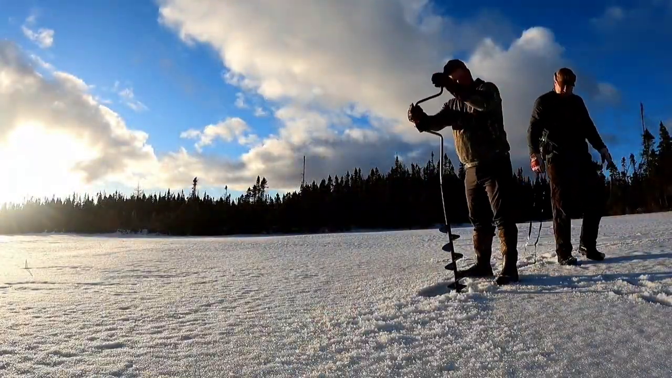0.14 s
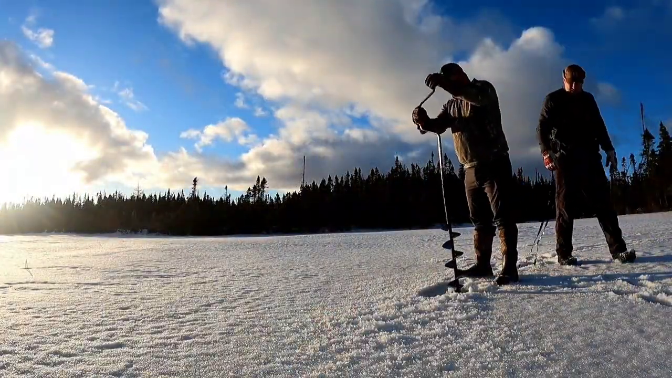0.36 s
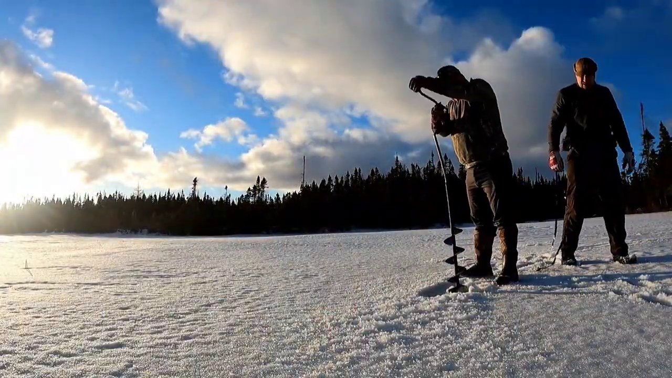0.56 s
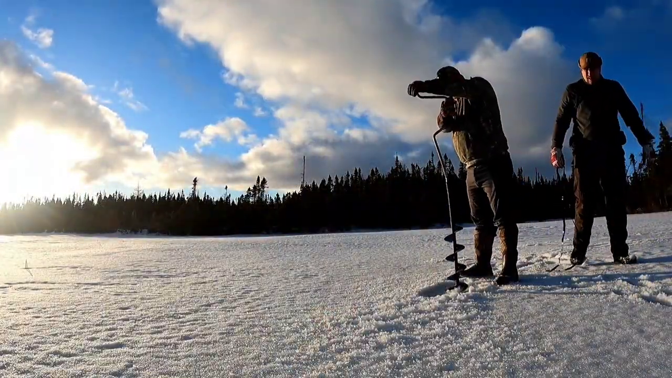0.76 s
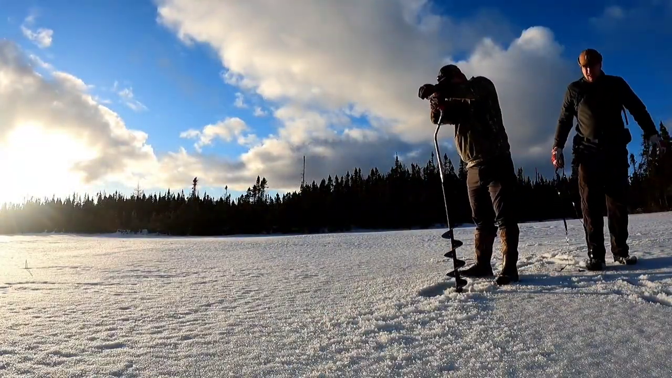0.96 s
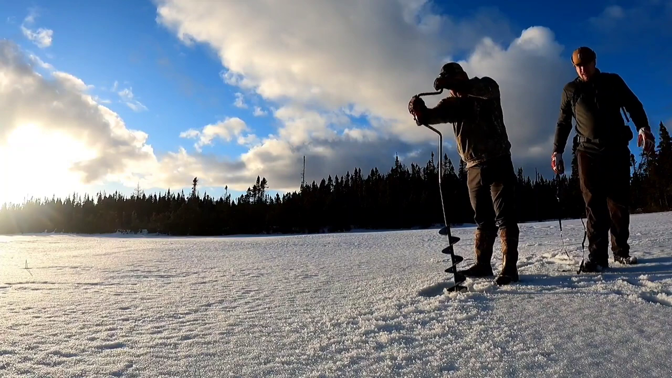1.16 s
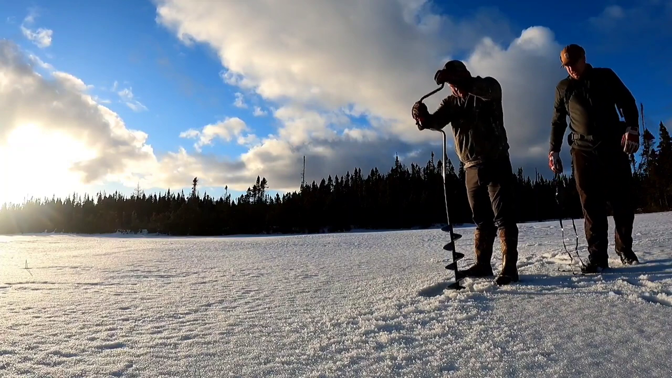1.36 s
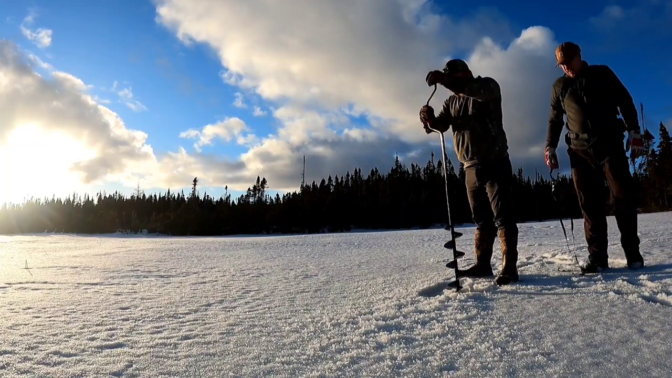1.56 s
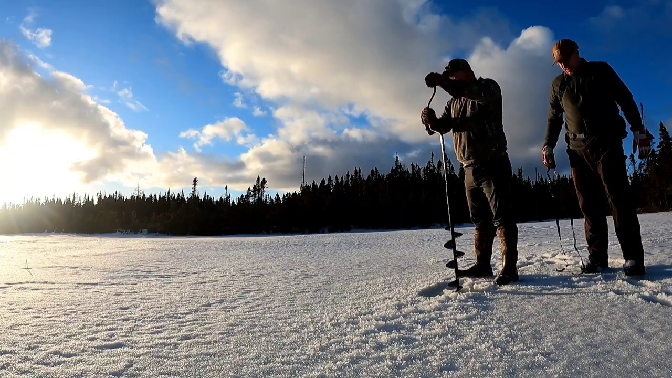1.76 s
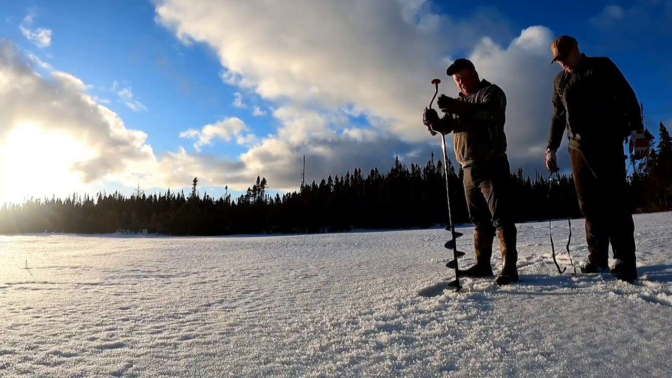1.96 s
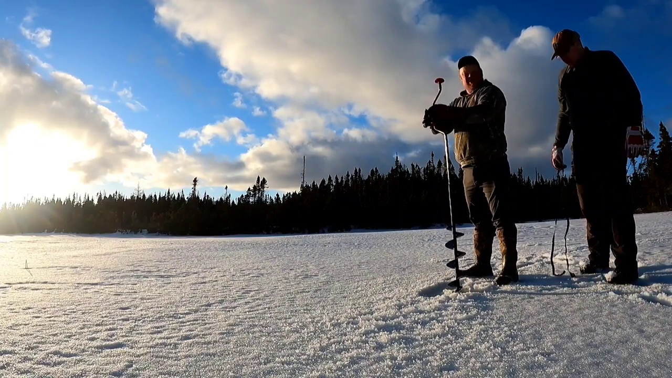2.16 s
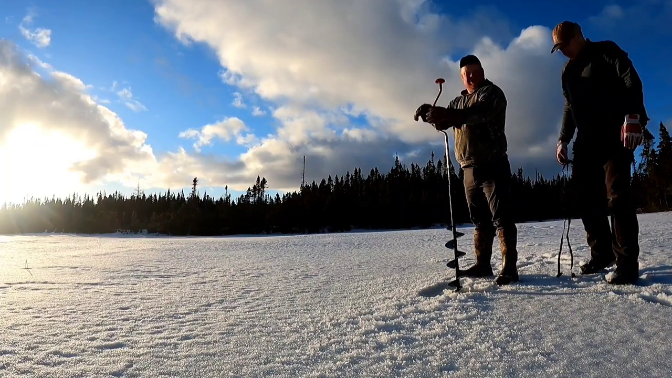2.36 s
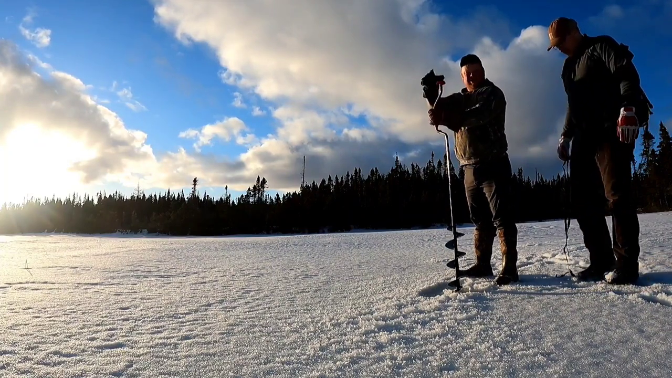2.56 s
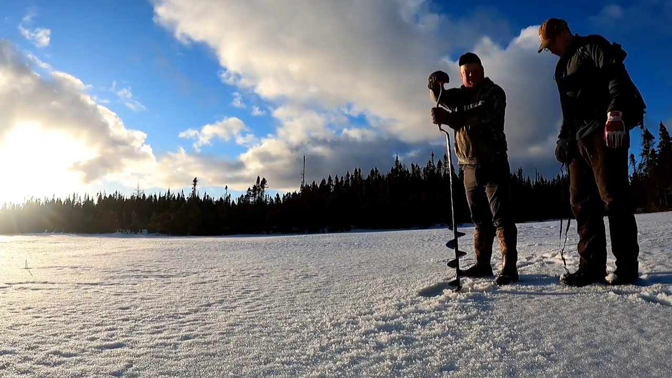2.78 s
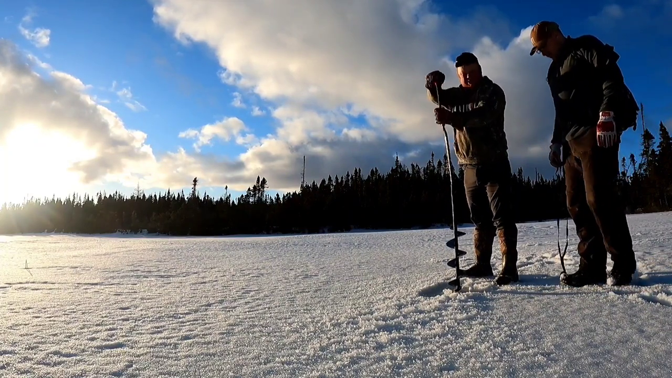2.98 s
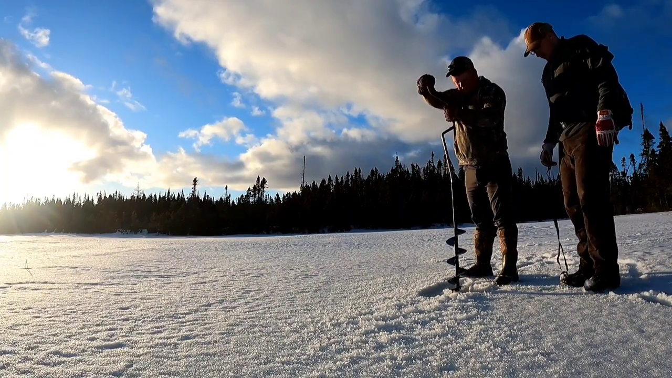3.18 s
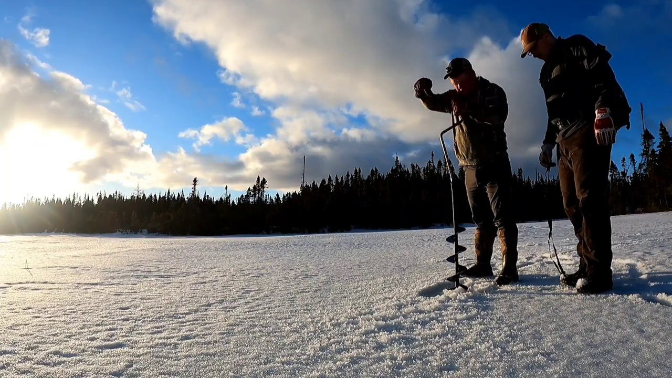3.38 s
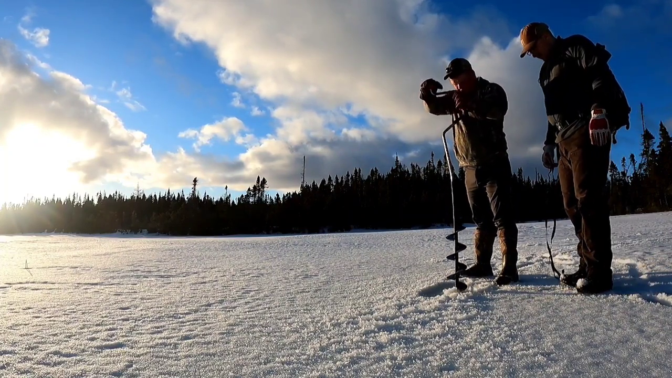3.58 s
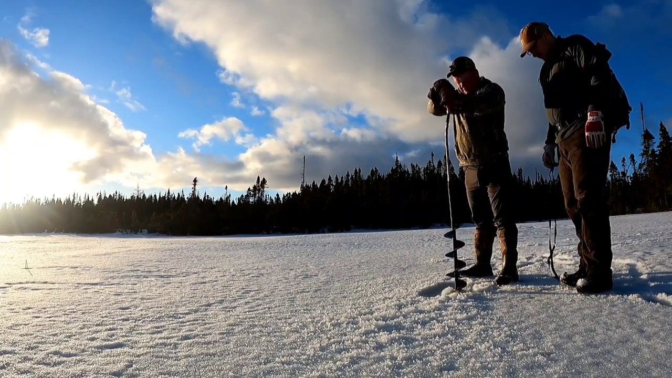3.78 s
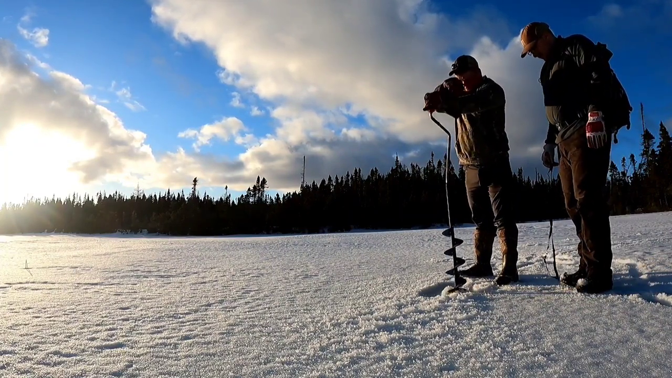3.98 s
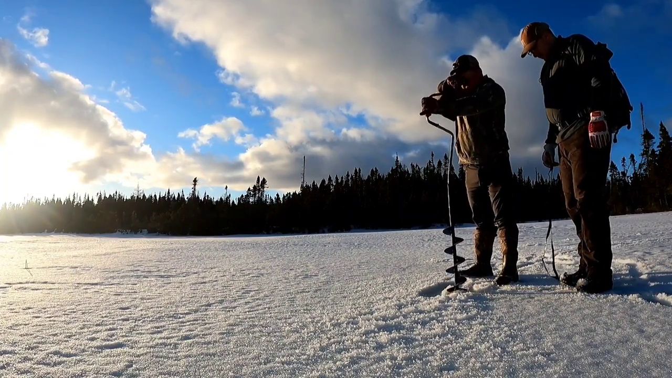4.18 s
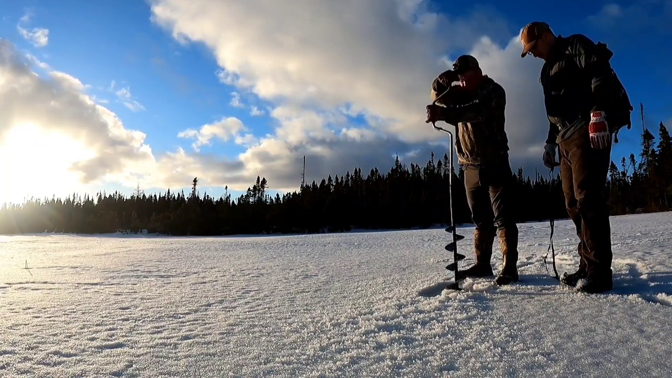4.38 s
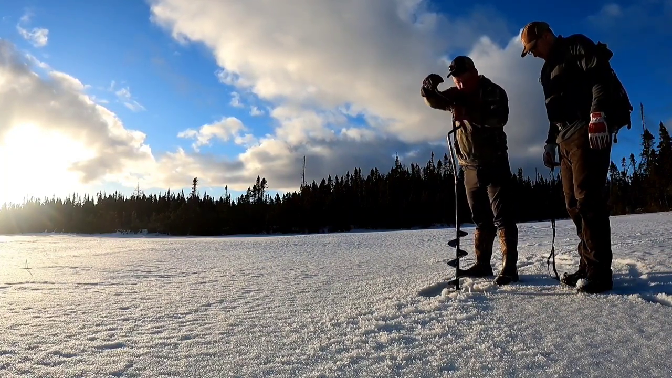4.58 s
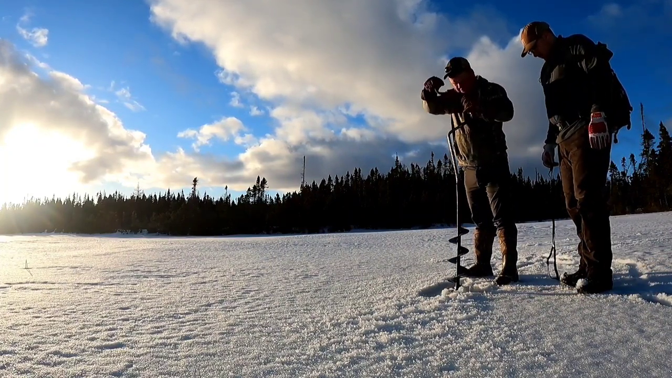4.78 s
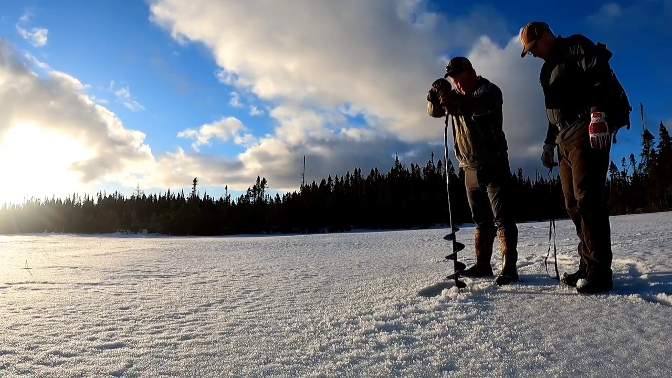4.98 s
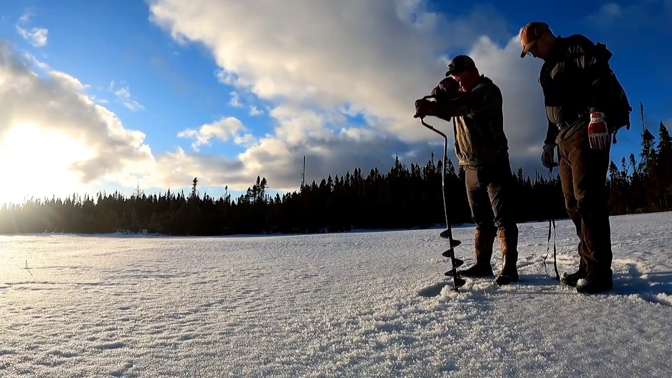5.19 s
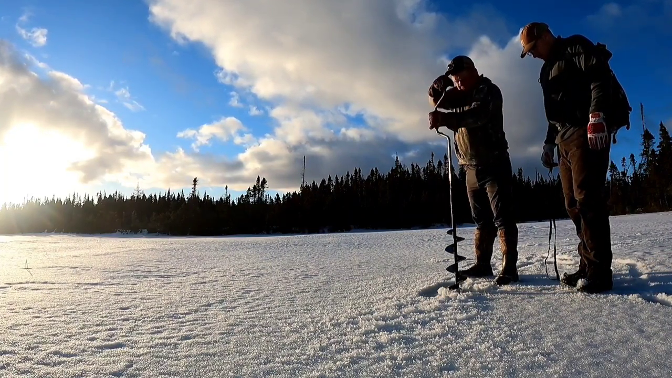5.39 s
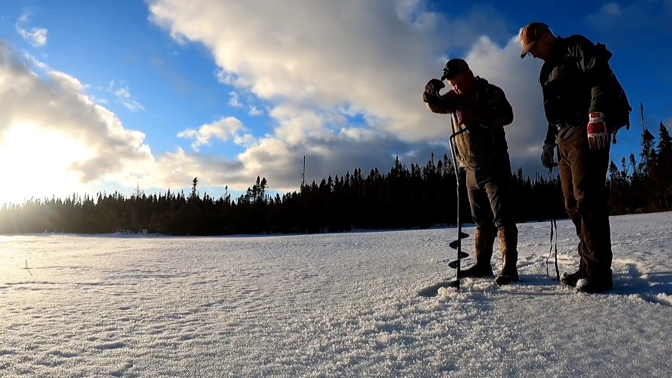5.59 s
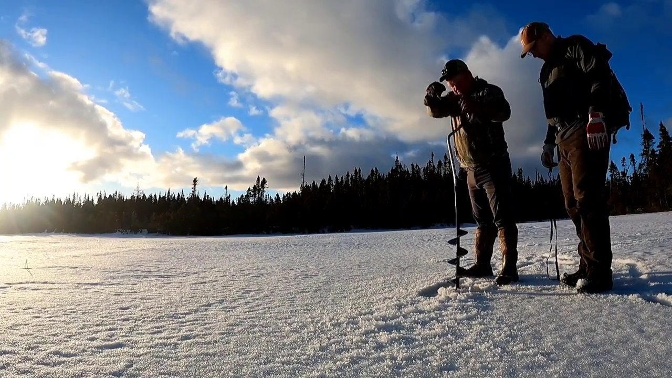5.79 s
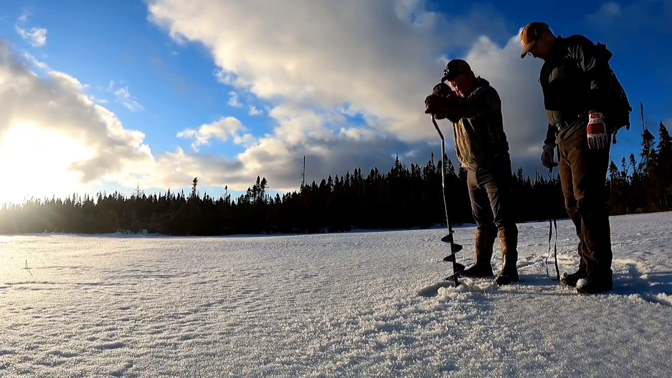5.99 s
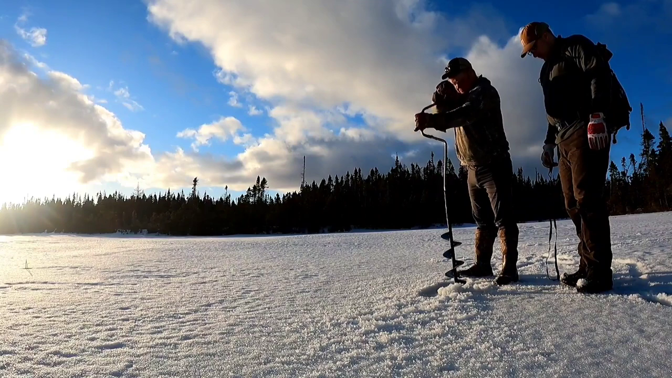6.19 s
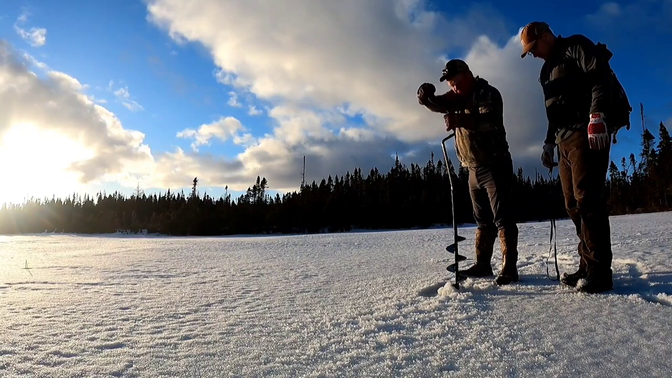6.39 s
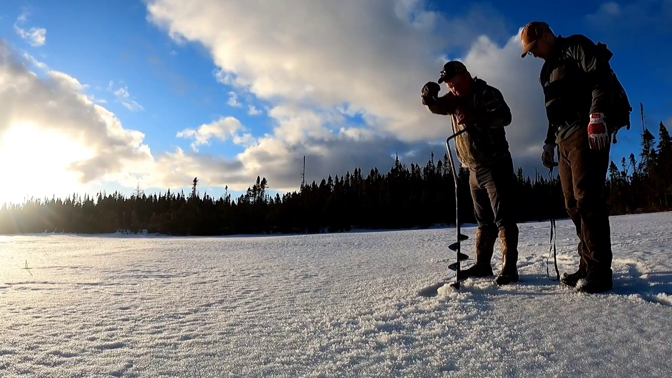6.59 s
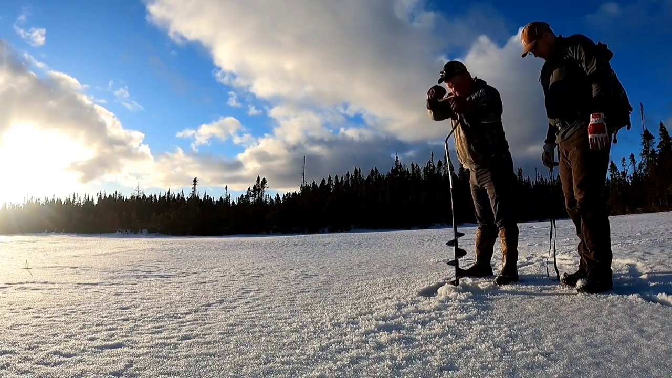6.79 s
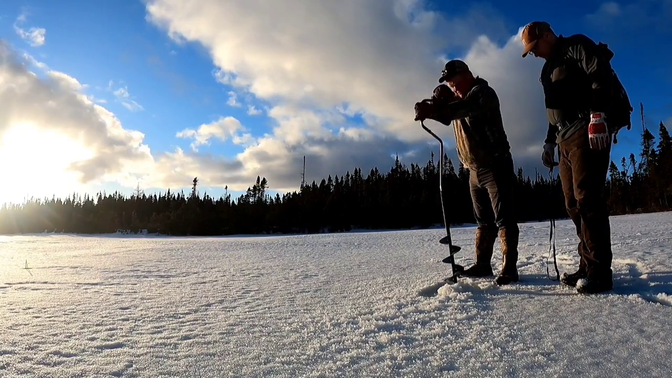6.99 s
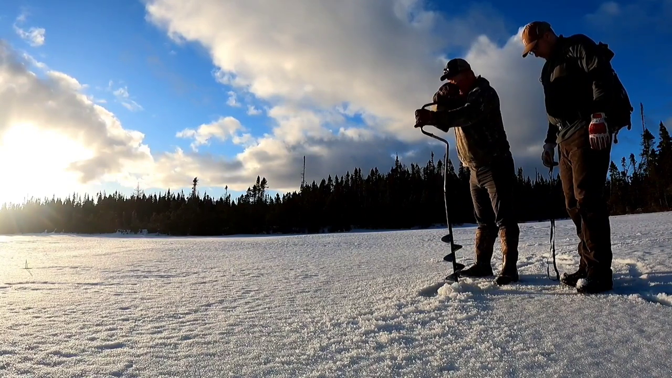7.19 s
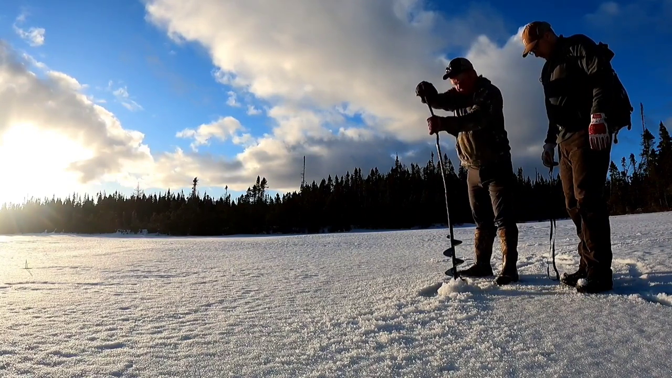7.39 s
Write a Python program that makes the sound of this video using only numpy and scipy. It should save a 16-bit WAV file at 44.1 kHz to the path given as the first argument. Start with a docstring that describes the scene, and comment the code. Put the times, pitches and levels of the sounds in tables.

```python
"""Light wind, still air and a faint drone run throughout on a snowy pond; two brief treads open the scene.
From 0.25 s a hand auger bores into the ice: chips, made as random cracks, ring the steel spiral and the ice.
From about 1.65 to 3.05 s the crank rests, and boots crunch and thud as filtered grains and short sines.
Cranking resumes to the end, with one jacket swish near 3.5 s; the groan sinks as the hole deepens.
Filtered noise makes the wind, air and cloth; two close microphone ports give the stereo."""
import sys
import numpy as np
from scipy import signal
from scipy.fft import rfft, irfft, next_fast_len
from scipy.io import wavfile
from scipy.ndimage import uniform_filter1d

SR = 44100
rng = np.random.default_rng(int(sys.argv[2]) if len(sys.argv) > 2 else 0)


def transcribe(u):
    """Save the signal u as a 16-bit wav file named by the first command-line argument.

    u: samples, shape (n,) or (channels, n), limited to [-1, 1]; the rate is SR.
    q: integer samples, one column per channel.
    """
    v = np.clip(np.atleast_2d(u).T, -1, 1)
    q = np.round(v * 32767).astype(np.int16)
    wavfile.write(sys.argv[1], SR, q)


N = 328545
TIME = np.arange(N) / SR
HZ = np.fft.rfftfreq(16384, 1 / SR)


def amp(db):
    """Decibels to gain."""
    return 10 ** (np.asarray(db) / 20)


def unit(x):
    """Scales to rms 1."""
    return x / np.sqrt(np.mean(x ** 2) + 1e-20)


def read(points, hz=HZ):
    """Joins (Hz, value) points on a log-frequency axis."""
    f, value = np.transpose(points)
    return np.interp(np.log(hz + 1), np.log(f + 1), value)


def over_time(points):
    """Joins (s, value) points with straight lines along the scene."""
    return np.interp(TIME, *np.transpose(points))


def add(mix, s, sound):
    """Mixes a sound in at time s."""
    part = mix[max(round(s * SR), 0):][:len(sound)]
    part += sound[:len(part)]


def swell(middle, length):
    """A smooth rise and fall; length is its width at half power."""
    return 0.5 ** (2 * ((TIME - middle) / length) ** 2)


def together(gains):
    """Joint gain of unrelated sounds: their powers add."""
    return np.sqrt(sum(gain ** 2 for gain in gains))


def wander(top_hz):
    """Slow random motion of rms 1, from a tenth of top_hz to a soft roll-off around it."""
    hz = np.fft.rfftfreq(N, 1 / SR)
    roll_off = (hz > top_hz / 10) / np.sqrt(1 + (hz / top_hz) ** 4)
    return unit(irfft(rfft(rng.standard_normal(N)) * roll_off, N))


def above(edge_hz):
    """Steep high-pass gain."""
    return 1 / np.sqrt(1 + (edge_hz / (HZ + 1)) ** 20)


def below(edge_hz):
    """Steep low-pass gain."""
    return 1 / np.sqrt(1 + (HZ / edge_hz) ** 20)


def ring(x, gain):
    """Passes x through a causal, minimum-phase filter of this gain shape and of energy 1."""
    log_gain = np.log(np.maximum(gain / gain.max(), 1e-5))
    circle = np.r_[log_gain, log_gain[-2:0:-1]]
    taps = np.fft.ifft(np.exp(np.conj(signal.hilbert(circle)))).real[:len(HZ)]
    return signal.oaconvolve(x, taps / np.linalg.norm(taps))[:N]


def resonate(x, hz, width_hz):
    """A resonance, scaled to rms 1, that follows the curve hz."""
    turn = np.exp(2j * np.pi * np.cumsum(hz * np.ones(N)) / SR)
    r = np.exp(-np.pi * width_hz / SR)
    # turn the pitch down to zero, smooth there, then turn it back up
    return unit((turn * signal.lfilter([1 - r], [1, -r], x / turn)).real)


def fractures(per_s, spread_db):
    """Random tiny cracks: many faint, a few strong."""
    size = amp(spread_db * np.minimum(rng.exponential(1, N), 4))
    return unit(size * rng.choice([-1, 1], N) * (rng.random(N) < per_s / SR))


# tone of the still air: pitch_hz [Hz], level_db [dB, relative]
AIR_TONE = [(80, -15), (150, -2.5), (230, -8), (300, -8), (450, -17.5), (720, -27), (1050, -10),
            (1300, -15), (2000, -26), (3000, -28), (6000, -29), (12000, -40), (14500, -47)]
# a faint low drone that comes and goes: start_s [s], level_db [dB]
DRONE_LEVEL = [(0, -67), (0.6, -52.5), (1.6, -57), (2.0, -63), (2.35, -54.5), (2.5, -46), (2.85, -51.5),
               (3.1, -56), (4.5, -54.5), (6.0, -53.5), (7.45, -54.5)]


def air():
    """A faint steady hush of noise, with a low drone made by two resonances in a row."""
    hush = amp(-56.5) * ring(rng.standard_normal(N), amp(read(AIR_TONE)) * above(74))
    drone = resonate(rng.standard_normal(N), 189.4, width_hz=43)
    drone = resonate(drone, 189.4, width_hz=43)
    return hush + drone * amp(over_time(DRONE_LEVEL))


# gusts on the microphone: middle_s [s], length_s [s, at half power], level_db [dB, before the mix trim]
WIND_GUSTS = [(0.126, 0.14, -45.5), (0.41, 0.18, -40), (0.77, 0.16, -39.5), (1.16, 0.33, -36.4),
              (1.69, 0.12, -43.5), (1.987, 0.23, -42), (2.66, 0.86, -44), (3.54, 0.037, -38),
              (3.983, 0.38, -41), (4.59, 0.27, -38), (5.23, 0.59, -38.2), (5.824, 0.16, -38.5),
              (6.136, 0.084, -51), (6.674, 0.14, -34), (7.114, 0.087, -40.5), (7.34, 0.08, -43)]


def wind_strength():
    """Gusts swell out of a calm breeze; their powers add."""
    calm = amp(-60.5)
    return together([calm] + [amp(db) * swell(middle, length) for middle, length, db in WIND_GUSTS])


# tone of the wind: pitch_hz [Hz], level_db [dB, relative]
WIND_TONE = [(8.8, -18), (15, 5.5), (44, -1), (67, -5.5), (129, -17.5), (170, -21.5), (220, -48),
             (370, -120)]


def rumble(breeze):
    """Lumpy wind noise that comes and goes with the breeze."""
    eddies = unit(rng.standard_normal(N) * amp(3.8 * wander(14)))
    return ring(eddies * breeze, amp(read(WIND_TONE)))


# single shoves of wind: start_s [s], level_db [dB, peak of the envelope], pitch_hz [Hz]
WIND_BUFFETS = [(0.337, -25.5, 35), (1.269, -24, 46.3), (1.844, -25, 51.1), (1.954, -28.5, 38.3),
                (2.682, -23, 26.9), (2.774, -27.5, 37.7), (6.589, -22, 61.9)]


def buffets():
    """Single eddies shove the microphone: low sines that peak after 8.9 ms and die away."""
    out, t = np.zeros(N), np.arange(SR // 5) / SR
    u = t / 0.0089
    for s, db, hz in WIND_BUFFETS:
        add(out, s, amp(db) * u * np.exp(1 - u) * np.sin(2 * np.pi * hz * t))
    return out


# one jacket swish: middle_s [s], length_s [s, at half power], level_db [dB], lower_edge_hz [Hz]
JACKET_SWISH = (3.5, 0.7, -58.5, 9800)


def jacket():
    """Smooth cloth slides over itself with a thin, high hiss."""
    middle, length, db, edge_hz = JACKET_SWISH
    return amp(db) * swell(middle, length) * ring(rng.standard_normal(N), above(edge_hz) * below(13000))


# heels land: start_s [s], level_db [dB, before the thud trim], pitch_hz [Hz, where the thud settles],
# snap_db [dB against the thud, before the snap trim]
HEEL_LANDINGS = [(1.192, -28, 237, 1), (2.135, -41.5, 200, 3), (2.243, -29.5, 162, -10),
                 (2.486, -40, 286, -18), (2.565, -43, 229, -18), (2.78, -35, 268, 4), (2.899, -28, 190, -2)]


def heels():
    """Each heel lands with a dull, falling thud, a snap of the crust and a puff of packing snow."""
    thuds, snaps, packing = np.zeros(N), np.zeros(N), np.zeros(N)
    t = np.arange(SR // 6) / SR
    u = t / 0.0038  # the blow peaks after 3.8 ms
    for s, db, hz, snap_db in HEEL_LANDINGS:
        blow = amp(db) * u * np.exp(1 - u)
        falling = 1 + 1.35 * np.exp(-t / 0.0045)
        add(thuds, s, 0.84 * blow * np.sin(2 * np.pi * hz * t * falling))
        add(snaps, s, amp(db + snap_db - 9.0) * np.exp(-t / 0.02) * rng.standard_normal(len(t)))
        add(packing, s, blow * amp(-18) * rng.standard_normal(len(t)))
    return thuds, snaps, packing


# boots press and scuff: middle_s [s], length_s [s, at half power], level_db [dB, crunch],
# packing_db [dB against the crunch, before the packing trim]
BOOT_TREADS = [(0.0, 0.05, -48.5, -8.5), (0.064, 0.037, -55, -13), (1.714, 0.12, -48.5, -4),
               (1.87, 0.053, -52, -3.5), (2.055, 0.077, -51.5, -2.5), (2.205, 0.068, -47, -2),
               (2.25, 0.014, -47, -8), (2.304, 0.036, -52.5, -2), (2.402, 0.066, -55.5, -3.5),
               (2.537, 0.068, -56, -15), (2.627, 0.041, -51.5, -12), (2.721, 0.048, -45.5, -8.5),
               (2.802, 0.069, -41.5, 0), (2.905, 0.021, -45.5, 3), (2.95, 0.057, -49.5, -3.5),
               (3.045, 0.045, -49.5, -3), (3.343, 0.08, -52, 7)]
# faint stirring between treads: start_s [s], end_s [s]
SHUFFLE_SPAN = (1.65, 3.05)
# tone of the snapping grains: pitch_hz [Hz], level_db [dB, relative]
CRUNCH_TONE = [(820, -64), (1400, 1), (1640, -3), (2540, -1.5), (3350, 0.5), (5620, 0), (7720, -7.5),
               (11800, -15.5), (15000, -31)]
# tone of the packing snow: pitch_hz [Hz], level_db [dB, relative]
PACKING_TONE = [(120, -1), (200, -4), (388, -7.5), (506, -7.5), (570, -6.5), (847, -8), (963, -2),
                (1480, -12.5), (1800, -14.5), (2340, -49), (3960, -120)]


def boots():
    """Snow grains snap in clumps and pack under the sole, with heel thuds on top."""
    start, end = SHUFFLE_SPAN
    stirring = uniform_filter1d(1.0 * (TIME > start) * (TIME < end), size=2000)
    treads = [(amp(db) * swell(middle, length), packing_db)
              for middle, length, db, packing_db in BOOT_TREADS]
    treads.append((amp(-65.5) * stirring, 0))
    crunch_level = together(weight for weight, _ in treads)
    packing_level = together(weight * amp(db) for weight, db in treads)

    clumps = unit(amp(0.57 * wander(70)))
    thuds, heel_snaps, heel_packing = heels()
    snaps = clumps * fractures(per_s=3000, spread_db=2) * crunch_level + heel_snaps
    packing = clumps * fractures(per_s=1000, spread_db=2) * packing_level + heel_packing
    crunch = ring(snaps, amp(read(CRUNCH_TONE)))
    return crunch + amp(4.0) * ring(packing, amp(read(PACKING_TONE))) + thuds


def body(broad, modes, narrowing, lift_db):
    """Gain of a broad spectrum with resonances standing out of it."""
    peaks = 0
    for hz, width, db in modes:
        width_hz = max(width * narrowing, 20)
        peaks = peaks + amp(db + lift_db) ** 2 / (1 + (2 * (HZ - hz) / width_hz) ** 2)
    return amp(read(broad)) * np.sqrt(1 + peaks)


# broad grind of the ice: pitch_hz [Hz], level_db [dB, relative]
ICE_GRIND = [(200, -1), (255, -0.5), (300, -5.5), (450, -4), (530, -7.5), (600, -5), (1000, 2.5), (1380, 8)]
# modes of the ice round the hole: pitch_hz [Hz], width_hz [Hz, before narrowing], level_db [dB above the grind]
ICE_MODES = [(635.3, 55.7, 20.0), (704.7, 30.2, 15.3), (833.1, 14.0, 17.9), (944.4, 52.2, 20.0),
             (1050.7, 23.6, 19.2), (1137.9, 33.9, 9.5), (1252.5, 49.5, 18.1)]


def ice_body():
    """The ice round the hole: a few strong modes over a broad grind."""
    return body(ICE_GRIND, ICE_MODES, narrowing=0.72, lift_db=0.0)


def crowded(ripple_db):
    """The spiral's countless weak upper modes: a fixed ripple that grows toward the treble."""
    ripple = uniform_filter1d(rng.standard_normal(len(HZ)), size=14)
    ripple = unit(uniform_filter1d(ripple, size=10))
    return amp(ripple_db * ripple * np.clip(HZ / 10000, 0, 1))


# broad rasp of the steel: pitch_hz [Hz], level_db [dB, relative]
STEEL_RASP = [(1340.0, -2.5), (2400.0, -9), (3500.0, -10.5), (5200.0, -6.5), (6600.0, -10.5),
              (8000.0, -12.5), (8800.0, -17), (10200.0, -16.5), (12000.0, -26), (14200.0, -34)]
# modes of the spiral: pitch_hz [Hz], width_hz [Hz, before narrowing],
# level_db [dB above the rasp, before the lift]
STEEL_MODES = [(1443.0, 29.0, 8.0), (1589.0, 14.0, 9.0), (1651.0, 41.0, 6.0), (1737.0, 31.0, 5.0),
               (1857.0, 21.0, 8.0), (1996.0, 38.0, 5.0), (2093.0, 57.0, 10.0), (2224.0, 110.0, 7.0),
               (2536.0, 58.0, 9.0), (2782.0, 55.0, 7.0), (3002.0, 110.0, 4.0), (3232.0, 56.0, 12.0),
               (3434.0, 45.0, 8.0), (3559.0, 37.0, 14.0), (3658.0, 53.0, 10.0), (3778.0, 39.0, 15.0),
               (3966.0, 63.0, 8.0), (4095.0, 46.0, 5.0), (4331.0, 110.0, 4.0), (4573.0, 110.0, 6.0),
               (4692.0, 28.0, 11.0), (4768.0, 110.0, 7.0), (4980.0, 90.0, 9.0), (5735.0, 110.0, 3.0),
               (6211.0, 84.0, 3.0), (7410.0, 18.0, 8.0), (7612.0, 16.0, 8.0), (7732.0, 70.0, 10.0),
               (7910.0, 19.0, 7.0), (8208.0, 14.0, 4.0)]


def steel_body():
    """The steel spiral: many modes over a broad rasp, crowded in the treble."""
    return body(STEEL_RASP, STEEL_MODES, narrowing=0.65, lift_db=2.5) * crowded(ripple_db=3.5)


# flakes break off: start_s [s], ice_db [dB, burst driving the ice], steel_db [dB, burst driving the steel],
# length_s [s, decay to 1/e]
FLAKE_CATCHES = [(0.062, -64, -48.5, 0.013), (0.271, -56, -43, .01), (1.261, -36.5, -52, 0.018),
                 (2.539, -42, -62, 0.009), (4.191, -31.5, -34, 0.0084), (4.418, -20.5, -23.5, 0.0076),
                 (5.58, -35, -40, 0.0038), (5.624, -13, -27, 0.0059), (6.642, -27.5, -40, 0.0074),
                 (6.693, -21, -25.5, 0.011), (7.344, -33, -30, 0.017), (7.389, -44, -25, 0.032)]


def catches(steel, ice):
    """The blades catch and a flake gives way: a short noise burst rings the ice and the steel."""
    in_ice, in_steel = np.zeros(N), np.zeros(N)
    for s, ice_db, steel_db, length in FLAKE_CATCHES:
        u = np.arange(SR // 10) / SR / length
        burst = rng.standard_normal(len(u)) * np.exp(-u ** 2)
        add(in_ice, s, amp(ice_db) * burst)
        add(in_steel, s, amp(steel_db) * burst)
    return ring(in_ice, ice * above(490) * below(1310)) + ring(in_steel, steel * above(1300))


def shifting(x, patchy_db):
    """As the contact moves, it favours now one group of modes, now another."""
    z = signal.stft(x, nperseg=1024)[2]
    patches = uniform_filter1d(rng.standard_normal(z.shape), size=7, axis=0)  # across pitch
    patches = unit(uniform_filter1d(patches, size=9, axis=1))  # across time
    return unit(signal.istft(z * amp(patchy_db * patches), nperseg=1024)[1][:N])


def chatter(judder_db, judder_hz, slips_per_s, slip_db, slip_s):
    """The blades judder, and now and then bite hard and ease off."""
    bites = rng.exponential(1, N).clip(0, 2) * (rng.random(N) < slips_per_s / SR)
    easing = signal.lfilter([1], [1, -np.exp(-1 / (slip_s * SR))], bites)
    return unit(amp(judder_db * wander(judder_hz) + slip_db * easing))


def push(start, length, bite_s):
    """The blades bite in, the force sags as the arm eases off, and the crank coasts to rest."""
    sag_db_per_s, release_s = 6, 0.033
    t = np.maximum(TIME - start, 0)
    bite = np.minimum(t / bite_s, 1)
    coast = np.exp(-(np.maximum(t - length, 0) / release_s) ** 2)
    return bite * amp(-sag_db_per_s * t) * coast


# pushes on the crank: start_s [s], length_s [s], bite_s [s, time to bite in],
# hiss_db [dB, before the hiss trim], groan_db [dB against the hiss, before the groan trim]
CRANK_PUSHES = [(0.247, 0.21, 0.056, -39, -12.5), (0.368, 0.17, 0.072, -31.5, -9),
                (0.547, 0.21, 0.015, -34.5, -1.5), (0.775, 0.18, 0.015, -37, -8),
                (0.869, 0.3, 0.13, -30.5, -5), (1.202, 0.29, 0.013, -36, -5.5),
                (1.412, 0.21, 0.024, -36.5, -1), (3.006, 0.21, 0.14, -35, -0.5),
                (3.243, 0.15, 0.015, -41, 2), (3.345, 0.2, 0.078, -32.5, 0.5), (3.567, 0.19, 0.01, -33, -3),
                (3.712, 0.27, 0.081, -31, -1), (3.986, 0.14, 0.038, -32, 1), (4.167, 0.26, 0.13, -28.5, 2),
                (4.405, 0.22, 0.066, -25.5, 3.5), (4.645, 0.24, 0.028, -28.5, 5),
                (4.892, 0.31, 0.043, -26.5, 3.5), (5.214, 0.24, 0.025, -28, 3.5),
                (5.398, 0.13, 0.018, -30, 6.5), (5.453, 0.12, 0.02, -31.5, 7), (5.607, 0.29, 0.085, -31, 5),
                (5.887, 0.33, 0.015, -29, 4.5), (6.237, 0.14, 0.02, -29, 3.5),
                (6.368, 0.057, 0.027, -29.5, 9), (6.438, 0.069, 0.015, -30, 4.5),
                (6.641, 0.045, 0.011, -38, 2.5), (6.692, 0.15, 0.005, -31.5, 5),
                (6.849, 0.15, 0.025, -30, 6.5), (6.995, 0.15, 0.068, -29.5, 3.5),
                (7.336, 0.088, 0.077, -26.5, 5.5)]


def cranking():
    """How hard the pushes drive the blades, the spiral and the ice."""
    clang_db, clang_follows = -4, 0.37  # dB against the hiss; share of the groan's swing it follows
    pushes = [(amp(db) * push(start, length, bite_s), groan_db)
              for start, length, bite_s, db, groan_db in CRANK_PUSHES]
    bite = together(force for force, _ in pushes)
    on_spiral = together(force * amp(clang_db + clang_follows * groan_db) for force, groan_db in pushes)
    on_ice = together(force * amp(groan_db) for force, groan_db in pushes)
    return bite, on_spiral, on_ice


# pitch at which the larger chips crack off: start_s [s], pitch_hz [Hz]
CHIP_PITCH_CURVE = [(0.3, 1590), (0.7, 1440), (1.1, 1660), (1.5, 1410), (3.1, 1020), (3.4, 1340),
                    (3.55, 1560), (3.8, 1040), (4.45, 1040), (4.8, 917), (5.1, 900), (5.3, 663), (5.5, 914),
                    (7.45, 875)]
# the ice's lowest modes as the hole deepens: start_s [s], level_db [dB against the groan before its trim]
DEEP_LEVEL = [(0.3, 0.5), (0.95, -21), (1.5, -12.5), (3.3, -14), (4.6, -18), (5.0, -9), (5.28, -2.5),
              (5.48, -6.5), (5.9, -1.5), (7.45, -5.5)]
# grinding at the bottom of the hole: start_s [s], level_db [dB against the hiss before its trim]
GRIND_LEVEL = [(0.3, -17), (3.6, -19), (4.2, -15.5), (4.6, -15.5), (5.0, -17), (5.8, -14), (6.4, -6.5),
               (7.4, -4)]


def auger(steel, ice):
    """Chips break under the blades and ring the steel and the ice."""
    grip = chatter(judder_db=1.0, judder_hz=111, slips_per_s=60, slip_db=1.33, slip_s=0.02)
    fine = shifting(grip * fractures(per_s=16000, spread_db=2.2), patchy_db=1.9)
    coarse = shifting(grip * fractures(per_s=7000, spread_db=2.2), patchy_db=1.5)
    # the larger chips crack off around one pitch, which sinks as the hole deepens
    pitched = resonate(coarse, over_time(CHIP_PITCH_CURVE), width_hz=110)
    chips = amp(-1) * coarse + amp(-24) * pitched

    bite, on_spiral, on_ice = cranking()
    hiss = amp(0.16) * ring(fine * bite, steel * above(2660))
    clang = ring(chips * on_spiral, steel * above(1387) * below(2550))
    groan = amp(-1.5) * ring(chips * on_ice, ice * above(685) * below(1378))
    deep = ring(chips * on_ice * amp(over_time(DEEP_LEVEL)), ice * above(642) * below(663))
    grind = ring(coarse * bite * amp(over_time(GRIND_LEVEL)), ice * above(236) * below(536))
    return hiss + clang + groan + deep + grind


# likeness of the two ports: pitch_hz [Hz], likeness [0 to 1]
PORT_LIKENESS = [(60, 0.55), (130, 0.83), (290, 0.93), (640, 0.95), (1410, 0.92), (3100, 0.71),
                 (6810, 0.86), (15000, 0.87)]
# level between the ports: pitch_hz [Hz], left_over_right_db [dB]
PORT_BALANCE = [(60, -3.5), (110, 3), (200, -0.5), (380, -2), (700, -2.5), (1290, -3.0), (2380, -2.5),
                (4400, -2.5), (8120, -3), (15000, 3)]
# phase between the ports: pitch_hz [Hz], left_lead_rad [radians]
PORT_LEAD = [(0, 0), (3530, -0.8), (5430, -0.4), (6720, -0.5), (8100, -0.0), (11400, -0.0), (11800, 0.5),
             (12900, 0.0), (15200, -0.0)]


def ports(x, flutter_hz, apart_db):
    """Two close ports hear the same sound, with a slight flutter of phase between them."""
    size = next_fast_len(N + SR)
    hz = np.fft.rfftfreq(size, 1 / SR)
    side = np.array([[1], [-1]])  # left, right
    unlike = amp(apart_db) * np.sqrt(1 - np.clip(read(PORT_LIKENESS, hz), 0, 1))
    pair = rfft(x, size) + 1j * side * unlike * rfft(x * wander(flutter_hz), size)
    balance = amp(side * read(PORT_BALANCE, hz) / 2)
    lead = np.exp(1j * side * np.interp(hz, *np.transpose(PORT_LEAD)) / 2)
    return irfft(pair * balance * lead, size)[:, :N]


def scene():
    """Open snow gives no echo: everything arrives dry, a little from the right."""
    steel, ice = steel_body(), ice_body()
    breeze = wind_strength()
    background = air() + amp(1.24) * rumble(breeze) + buffets()
    shared = background + jacket() + boots() + catches(steel, ice) + auger(steel, ice)
    # each port also has its own eddies
    own_wind = amp([[-9], [-4]]) * np.array([rumble(breeze), rumble(breeze)])
    return ports(shared, flutter_hz=59.6, apart_db=-6.5) + own_wind


def record(dry):
    """The recorder's band limit: a steep low-pass at 14350 Hz."""
    taps = signal.firwin(255, 14350, window=("kaiser", 8), fs=SR)
    return signal.oaconvolve(dry, taps[None], "same", axes=1)


dry = scene()
out = record(dry)
transcribe(out)
```